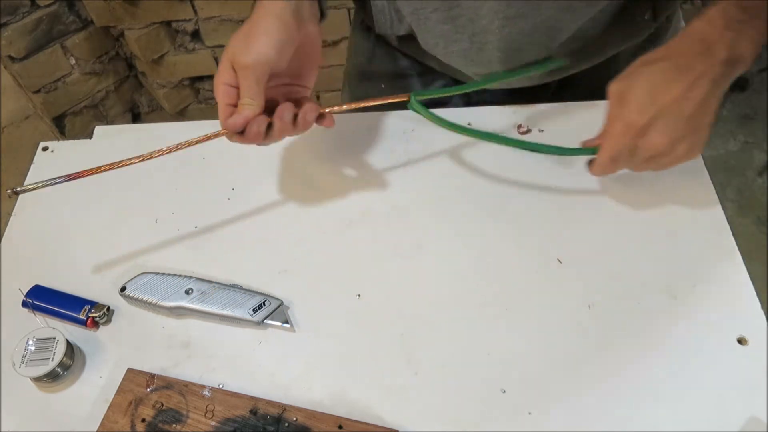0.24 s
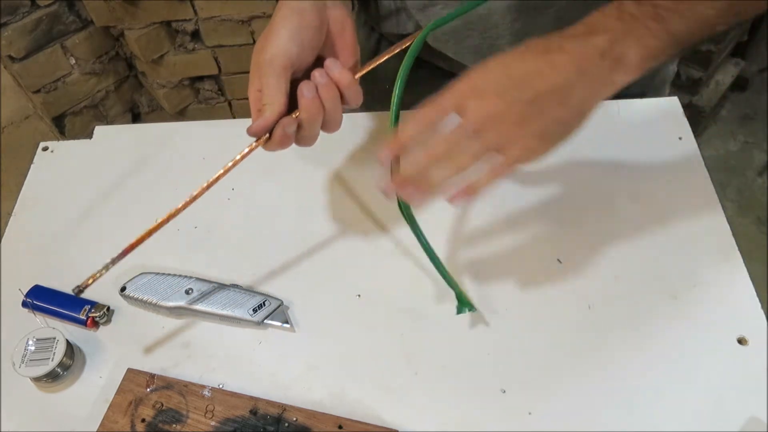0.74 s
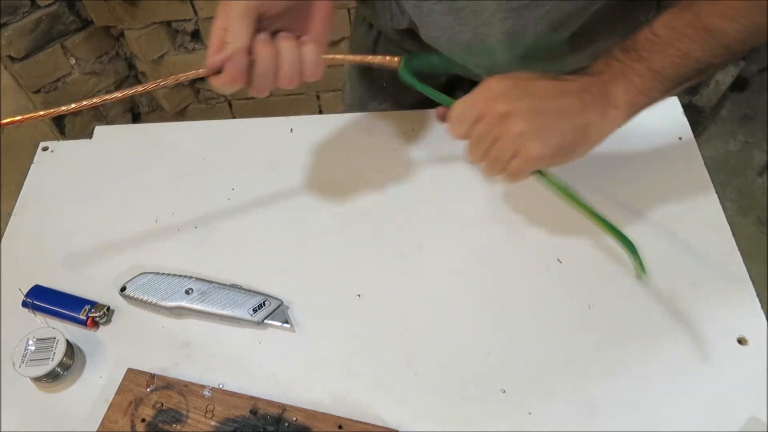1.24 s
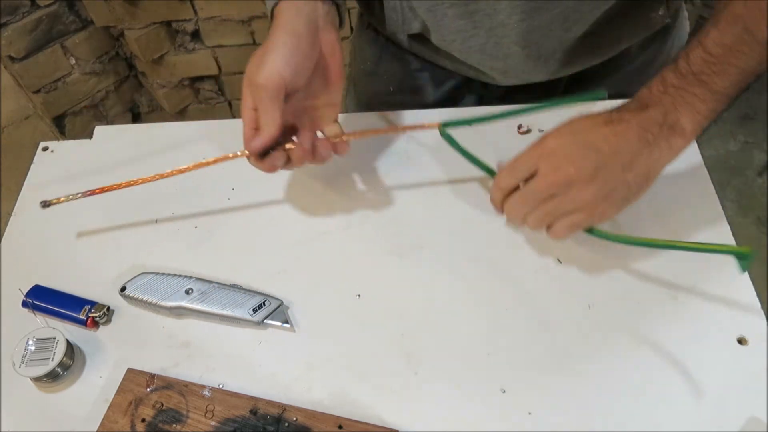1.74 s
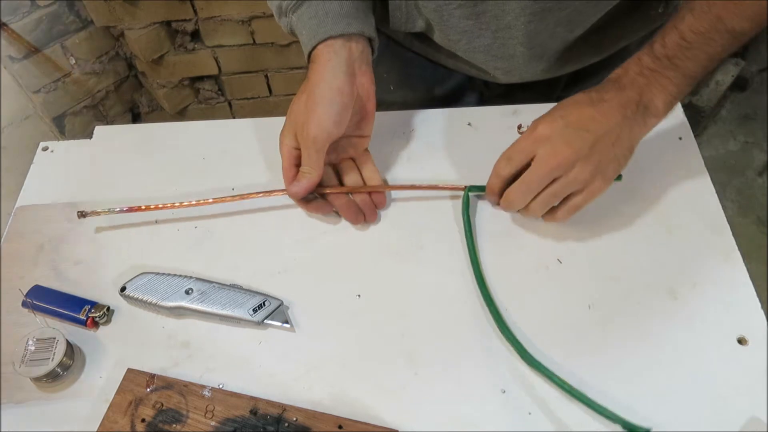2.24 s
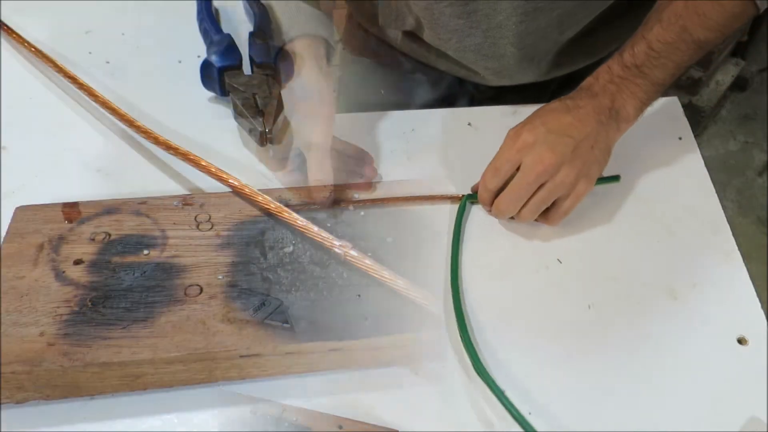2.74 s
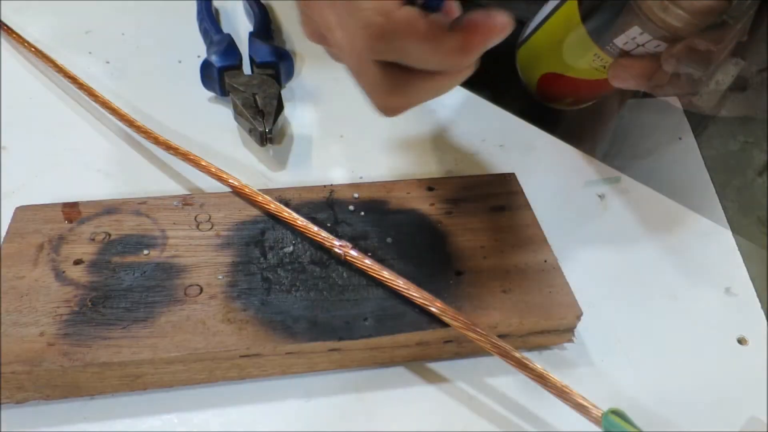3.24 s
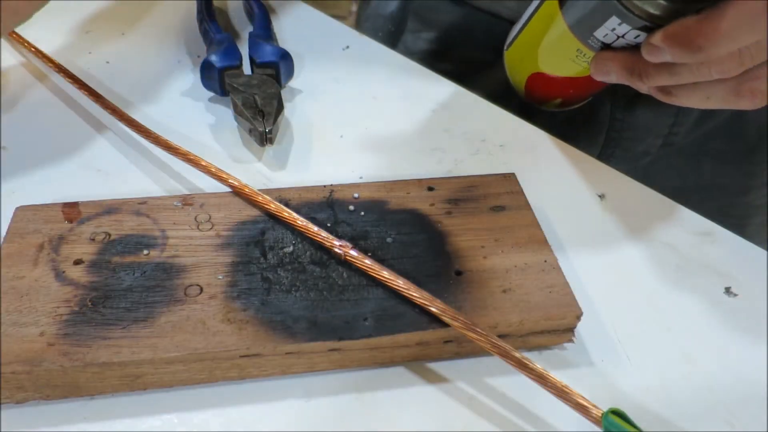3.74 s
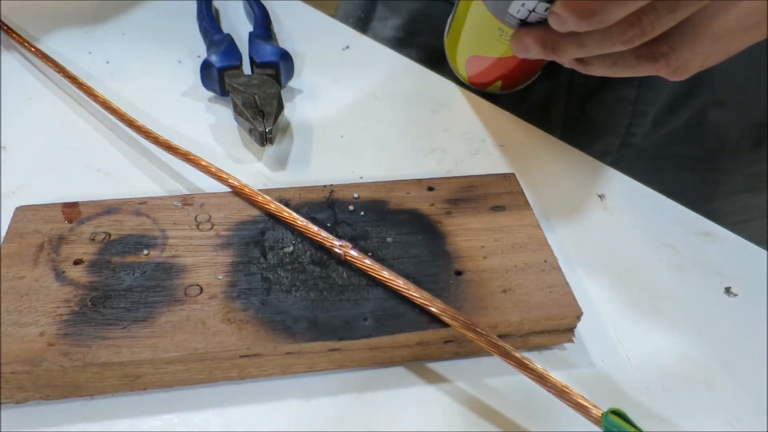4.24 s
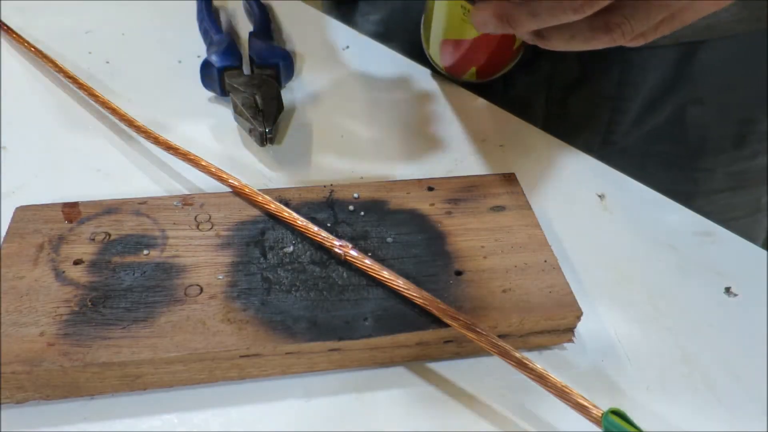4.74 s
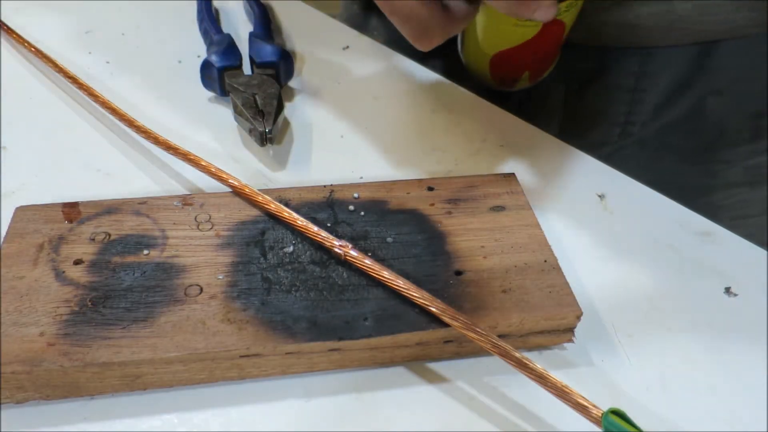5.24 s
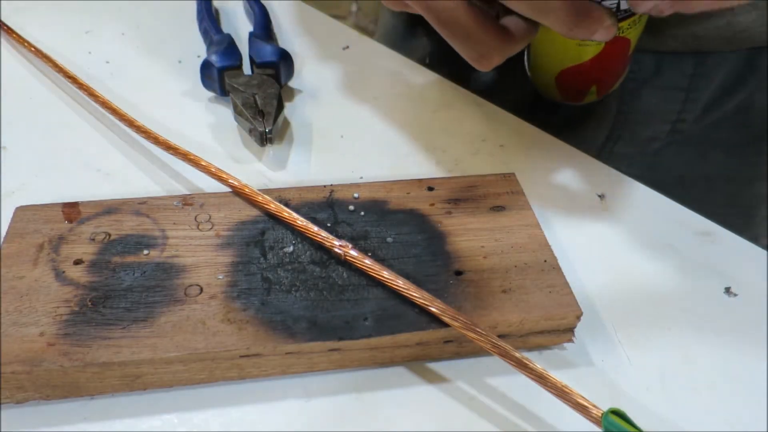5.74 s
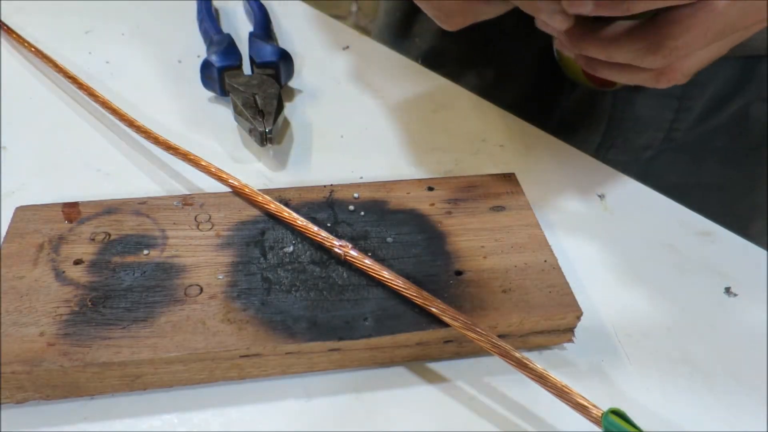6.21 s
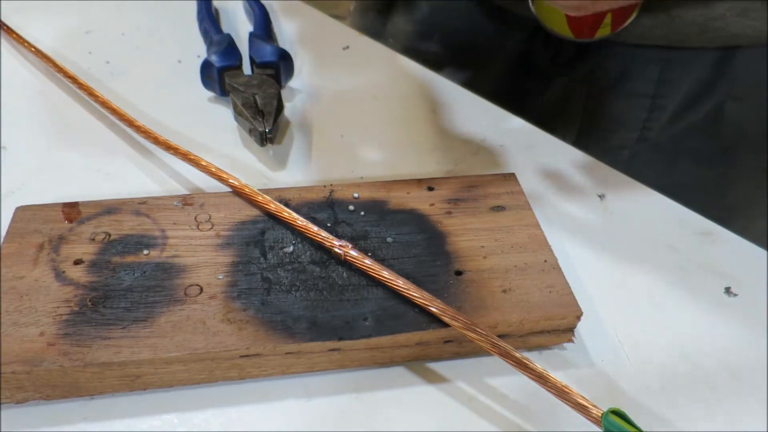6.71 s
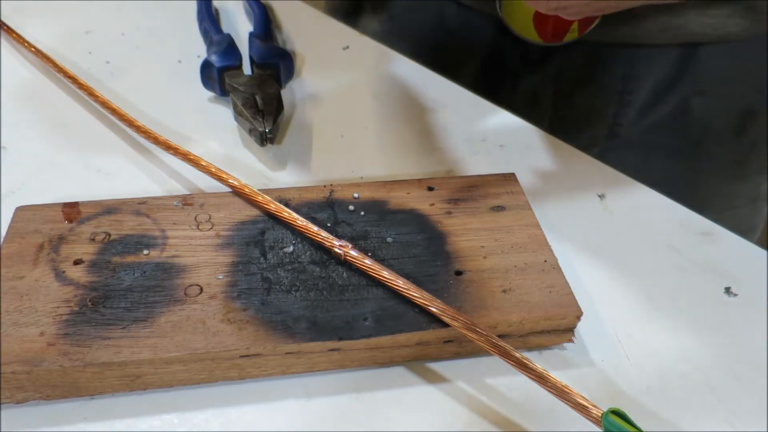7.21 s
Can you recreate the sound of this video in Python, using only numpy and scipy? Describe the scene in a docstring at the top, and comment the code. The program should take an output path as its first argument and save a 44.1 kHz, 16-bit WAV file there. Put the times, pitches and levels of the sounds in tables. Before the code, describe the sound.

Sharp crackling and a snap of stripped cable, a brief gas hiss, a lighter's scratch, then a rushing torch flame with one hard trigger clack.

```python
"""Faint workshop air; plastic insulation cracks off a thick copper cable, with one last snap.
A hand torch is opened, hisses, knocks, is lit by a flint lighter and burns; its trigger clacks twice.
Cracks, clicks, knock and pops are jolts into resonances; air, gas and flame are shaped noise.
Gain control ducks at each loud crack or clack: air and flame vanish and slowly swell back."""
import sys
import numpy as np
from scipy import signal
from scipy.fft import rfft, irfft
from scipy.io import wavfile
from scipy.ndimage import uniform_filter1d, minimum_filter1d

SR = 44100
rng = np.random.default_rng(int(sys.argv[2]) if len(sys.argv) > 2 else 0)


def store_pcm(level_fs):
    """Save levels as 16-bit WAV."""
    pcm = np.round(np.clip(level_fs, -1, 1) * 32767).astype(np.int16)
    wavfile.write(sys.argv[1], SR, np.atleast_2d(pcm).T)


N = 329427
TIME = np.arange(N) / SR  # s
HZ = np.maximum(np.arange(N // 2 + 1) * SR / N, 1)


def from_db(db):
    """Decibels to gain."""
    return 10 ** (np.asarray(db) / 20)


def rms_one(x):
    """Scale to rms 1."""
    return x / np.sqrt(np.mean(x ** 2) + 1e-20)


def in_time(rows):
    """Each column of a curve at every sample."""
    s, *columns = np.transpose(rows)
    return [np.interp(TIME, s, column) for column in columns]


def at_hz(points, hz):
    """Read a table along log frequency."""
    table = np.array(points)
    return np.interp(np.log(hz), np.log(table[:, 0]), table[:, 1])


def held(start, end, attack_s, release_s):
    """Gain that grows exponentially to 1 at `start`, holds until `end` and dies away."""
    before, after = np.maximum(start - TIME, 0), np.maximum(TIME - end, 0)
    return np.exp(-before / attack_s - after / release_s)


def strokes(rows, attack_s, release_s):
    """One held gain for each row, at its own level."""
    return sum(from_db(db) * held(start, end, attack_s, release_s) for start, end, db in rows)


def drift(rate_hz):
    """Smooth chance of rms 1 that changes about `rate_hz` times a second."""
    return rms_one(irfft(rfft(rng.standard_normal(N)) / (1 + (HZ / rate_hz) ** 2), N))


def noise_spectrum(colour, width, peaks=()):
    """Spectrum of stereo noise with a colour, a side-to-mid width and resonances."""
    gain_db = at_hz(colour, HZ)
    for hz, width_hz, db in peaks:
        gain_db = gain_db + db / (1 + (2 * (HZ - hz) / width_hz) ** 2)
    mid, side = rfft(rng.standard_normal((2, N)))
    return from_db(gain_db) * (mid + from_db(at_hz(width, HZ)) * side * [[1], [-1]])


def to_sound(spectrum):
    """Stereo spectrum to samples, with rms 1 in the middle."""
    x = irfft(spectrum, N)
    return x / x.mean(axis=0).std()


def rushing(gain, colour, width, rough_db, rate_hz):
    """Turbulent noise that follows an envelope and flutters."""
    return gain * from_db(rough_db * drift(rate_hz)) * to_sound(noise_spectrum(colour, width))


def resonate(x, hz, width_hz):
    """One two-pole resonance with gain 1 on top."""
    r = np.exp(-np.pi * width_hz / SR)
    feedback = [1, -2 * r * np.cos(2 * np.pi * hz / SR), r * r]
    return signal.lfilter(np.array([1, 0, -1]) * (1 - r * r) / 2, feedback, x)


def crackle(per_s, spread_db):
    """Random single-sample bursts of either sign and random size; rms 1."""
    sizes = from_db(spread_db * np.minimum(rng.exponential(1, N), 4)) * rng.choice([-1, 1], N)
    return rms_one(sizes * (rng.random(N) < per_s / SR))


def scatter(x, length_s, count=2):
    """Waves to and fro in a part (all-pass loops) smear a jolt in time, not in colour."""
    for share in rng.uniform(.1, .36, count):
        loop = np.r_[1, np.zeros(int(share * length_s * SR)), rng.choice([-1, 1]) * np.sqrt(.5)]
        x = signal.lfilter(loop[::-1], loop, x)
    return x


def strikes(events, modes, grit, squash, spread, pan_db, polarity=-1, detune=0, size=4096):
    """Scattered jolts and crumbling micro-slips drive modes, detuned per event; sides differ a little."""
    out, t = np.zeros((2, N + size)), np.arange(size) / SR
    for s, peak_db, loudest_hz, fall_db, length_s in events:
        jolt = (t == 0) + grit * rng.standard_normal(size) * np.exp(-t / length_s)
        force = scatter(jolt, length_s) + spread * scatter(jolt, length_s) * [[1], [-1]]
        shift = np.exp(detune * (2 * rng.random(len(modes)) - 1))
        ring = 0
        for k, (hz, width_hz, db) in enumerate(modes):
            mode_db = db - fall_db * abs(np.log2(hz / loudest_hz))
            sign = np.sign(polarity) ** k  # -1: signs alternate
            ring = ring + sign * from_db(mode_db) * resonate(force, hz * shift[k], width_hz)
        squashed = np.tanh(squash * ring / np.abs(ring).max()) / np.tanh(squash)
        start = int(s * SR)
        out[:, start:start + size] += from_db(peak_db) * squashed
    return out[:, :N] * from_db([[pan_db], [-pan_db]])


def broadened(modes, factor):
    """The same modes with scaled widths."""
    return [(hz, factor * width_hz, db) for hz, width_hz, db in modes]


def rebound(x, lag_s, echo_db):
    """The sound and one distinct reflection of it."""
    return x + from_db(echo_db) * np.array([np.interp(TIME - lag_s, TIME, side) for side in x])


# workshop reverberation: f/Hz, t60/s
ROOM_T60 = [(200, 0.79), (1000, 0.3), (4000, 0.31), (8000, 0.24), (15000, 0.21)]


def workshop(x, wet_db, early_db, early_s, size=26000):
    """Quick scatter off bench and hands, then a diffuse tail whose decay time depends on frequency."""
    t, edges_hz, tail = np.arange(size) / SR, np.geomspace(100, 17000, 9), 0
    for low, high in zip(edges_hz, edges_hz[1:]):
        common, left, right = rng.standard_normal((3, size))
        white = common + 1.16 * np.array([left, right])
        band = signal.sosfilt(signal.butter(2, [low, high], "band", fs=SR, output="sos"), white)
        tail = tail + band * from_db(-60 * t / at_hz(ROOM_T60, np.sqrt(low * high)))
    early = white[:, ::-1] * np.exp(-t / early_s) * (t > .002)
    late = from_db(wet_db) * rms_one(tail * (t > .005))
    response = (late + from_db(early_db) * rms_one(early)) / np.sqrt(size)
    return x + signal.fftconvolve(x.mean(axis=0)[None], response, axes=1)[:, :N]


# workshop air spectrum: f/Hz, relative density/dB
AIR_COLOUR = [(15, -44.5), (25, -18.5), (92, -3), (180, -8), (277, -5.5), (354, -7.5), (405, -7),
              (516, -10.5), (1020, -10.5), (2050, -12.5), (3720, -15), (10100, -23), (11600, -23),
              (16000, -31.5)]
# stereo width of diffuse noise: f/Hz, side minus mid/dB
AIR_WIDTH = [(40, -25), (200, 5), (800, 0.5), (2500, -9), (6000, -4), (15000, -2)]


def workshop_air(level_db=-41):
    """Steady broad noise, fluttering slightly."""
    return rushing(from_db(level_db), AIR_COLOUR, AIR_WIDTH, rough_db=.5, rate_hz=17)


# insulation cracks: t/s, peak level/dB, loudest f/Hz, fall-off either side/(dB/octave), length/s
CRACKS = [(.118, 2, 5500, 4, .0004), (.1342, -5, 8000, 2, .0003), (.1533, -.5, 7500, 3, .0008),
          (.1616, -7, 4200, 9, .0008), (.1727, 2, 7000, 5, .0006), (.1968, 27.5, 8600, 4, .00046),
          (.2141, 21.5, 8600, 13, .0004), (.2307, 23, 6900, 9, .0004), (.251, 23, 7500, 7, .0006),
          (.2714, 18, 8000, 9, .0006), (.2859, 17.5, 7500, 10, .0003), (.3106, 17.5, 8600, 15, .0004),
          (.816, -23, 12000, 10, .004), (1.051, -29, 12000, 5, .004), (1.068, -28.5, 11000, 7, 0.0048)]
# cable resonances: f/Hz, width/Hz, level/dB
CABLE_MODES = [(830, 260, -3.5), (1980, 360, 0.5), (2700, 300, -3), (3660, 330, -4.5), (4530, 490, 4.5),
               (5360, 700, 5), (7700, 1300, -1.5), (8700, 770, 1), (11360, 1100, 1)]
# rasp spectrum: f/Hz, relative density/dB
RASP_COLOUR = [(100, -23), (400, -4), (1000, -13), (2000, 0), (5000, 4.5), (9000, -1), (13000, -1.5),
               (16000, -18)]


def insulation(pull_from_s=.117, pull_to_s=.2, rasp_db=-33, rasp_fade_s=.038, grain_db=-7):
    """Sheath lets go of the strands in jerks; while it is pulled each sets off a rasp and tiny grains."""
    cracks = strikes(CRACKS, CABLE_MODES, grit=.035, squash=1.13, spread=.28, pan_db=-.5, detune=.12)
    cracks = rebound(cracks, lag_s=.003, echo_db=-18.5)
    jerks = 0
    for s, db, *_ in CRACKS:  # rasp_db is relative to the crack's peak
        jerks = jerks + from_db(db + rasp_db) * np.exp(-abs(TIME - s) / rasp_fade_s) * (TIME > s)
    tearing = jerks * held(pull_from_s, pull_to_s, attack_s=.002, release_s=.099)
    rasp = rushing(tearing, RASP_COLOUR, AIR_WIDTH, rough_db=2.5, rate_hz=270)
    grains = sum(from_db(db) * resonate(crackle(per_s=210, spread_db=-.5), hz, width_hz)
                 for hz, width_hz, db in CABLE_MODES)
    grains = tearing * from_db(grain_db) * rms_one(grains)
    return workshop(cracks + rasp + grains, wet_db=-15, early_db=-10, early_s=.0035)


# sheath breaks off: t/s, peak level/dB, loudest f/Hz, fall-off either side/(dB/octave), length/s
SNAP = [(1.3013, 23.5, 4070, 3.5, .0008)]
# freed sheath resonances: f/Hz, width/Hz, level/dB
SHEATH_MODES = [(1120, 370, -5), (2140, 220, 1), (3460, 400, 0.5), (4510, 250, 5), (5520, 810, 4),
                (7360, 340, -5), (8600, 650, -5.5), (10700, 1800, 3)]


def sheath_snap():
    """The sheath breaks off and rings; a broadened copy feeds only the room, which hears all sides."""
    snap = strikes(SNAP, SHEATH_MODES, grit=.022, squash=2.43, spread=.22, pan_db=-.4)
    blurred = strikes(SNAP, broadened(SHEATH_MODES, 2.7), grit=.027, squash=.74, spread=.2, pan_db=-4)
    return snap + workshop(blurred, wet_db=-15, early_db=-10, early_s=.0035) - blurred


# valve and trigger: t/s, peak level/dB, loudest f/Hz, fall-off either side/(dB/octave), length/s
CLICKS = [(2.1394, 1, 8100, 17, 0.00069), (3.811, -17, 9000, 0, 0.00093), (3.908, -21, 12000, 7, 0.0012),
          (3.9514, 10, 4300, 37, 0.00076), (3.9526, 3, 5200, 8, 0.00094), (3.9788, -10, 5500, 9, .0004),
          (3.9845, 22.5, 2700, 14, 0.00049), (3.9852, 22, 3500, 14, 0.00077),
          (4.0445, -3.5, 3000, 7, 0.00091), (4.0822, -0.5, 1550, 40, 0.00044), (4.083, -8, 7500, 18, .001),
          (4.115, -11.5, 8000, 24, 0.0023), (4.135, -11, 1690, 14, .001), (4.149, -20, 8080, 11.5, .002),
          (6.303, -19, 9000, -3, 0.0014), (6.484, -23, 11000, -5, 0.0013)]
# torch body resonances: f/Hz, width/Hz, level/dB
TORCH_MODES = [(950, 500, 1), (1550, 250, 6.5), (2050, 460, 8.5), (2700, 460, 7.5), (3600, 540, 6),
               (4690, 300, 0), (5750, 1100, -3.5), (7260, 2500, 0), (8800, 1400, -17), (11300, 3700, -3)]


def torch_clicks():
    """Valve and trigger jolt the torch body, which rings."""
    clicks = strikes(CLICKS, TORCH_MODES, grit=.028, squash=1.29, spread=.51, pan_db=.5,
                     polarity=1, detune=.053)
    return workshop(clicks, wet_db=-19.5, early_db=-11, early_s=.0066)


# trigger slides, light then hard: from t/s, to t/s, level/dB
SLIDES = [(3.935, 3.951, -31.5), (3.955, 3.982, -22), (3.988, 4.001, -9)]
# slide spectrum: f/Hz, relative density/dB
SLIDE_COLOUR = [(200, -12), (1000, -2), (2500, 1), (6000, -5.5), (10000, -8), (15500, -8)]


def trigger_slide():
    """The trigger slides under the finger: short strokes of rough noise."""
    stroke = strokes(SLIDES, attack_s=.001, release_s=.0039)
    return rushing(stroke, SLIDE_COLOUR, AIR_WIDTH, rough_db=3.5, rate_hz=180)


# hollow torch knock: t/s, peak level/dB, loudest f/Hz, fall-off either side/(dB/octave), length/s
KNOCK = [(2.41, 5, 1280, 2, 0.00057)]
# knock resonances: f/Hz, width/Hz, level/dB
KNOCK_MODES = [(227, 23, -1.5), (385, 51, -5.5), (1034, 347, 3.5), (1304, 448, 6), (1485, 420, -1),
               (2340, 360, -22), (4140, 900, -28), (9000, 5900, -47)]


def torch_knock():
    """Hollow knock with one wall echo; a narrowed copy feeds only the room, which hears all sides."""
    knock = strikes(KNOCK, KNOCK_MODES, grit=.02, squash=1.22, spread=.077, pan_db=.1)
    blurred = strikes(KNOCK, broadened(KNOCK_MODES, .9), grit=.027, squash=.92, spread=.1,
                      pan_db=-3.5, polarity=1)
    tail = workshop(blurred, wet_db=-9.5, early_db=-9.5, early_s=.011) - blurred
    return rebound(knock, lag_s=.0135, echo_db=-15) + tail


# burner tick: t/s, peak level/dB, loudest f/Hz, fall-off either side/(dB/octave), length/s
TICK = [(2.8422, -6, 3100, 2, .002)]
# burner resonances: f/Hz, width/Hz, level/dB
TICK_MODES = [(2780, 230, -1), (3100, 260, 0), (3500, 260, -1), (7000, 500, -9)]


def burner_tick():
    """The burner ticks once as it heats, and rings."""
    tick = strikes(TICK, TICK_MODES, grit=.042, squash=.43, spread=.27, pan_db=0)
    return workshop(tick, wet_db=-9, early_db=-10, early_s=.008)


LIT_S = 2.597  # flame catches
# unlit gas spectrum: f/Hz, relative density/dB
GAS_COLOUR = [(47, -30), (80, 3), (242, -6), (323, -16), (404, -5), (937, -6), (1400, -4.5), (1740, -7.5),
              (2900, -4.5), (4700, -7), (5450, 1.5), (6100, -5), (7300, -5.5), (8300, -11.5), (9900, -4),
              (11000, -10), (16000, -21)]
# stereo width of the jet: f/Hz, side minus mid/dB
JET_WIDTH = [(60, -42), (300, -40), (1400, -19), (3100, -49), (6000, -25), (10000, -4), (15000, -3)]


def unlit_gas(valve_s=2.142, level_db=-36.5, burst_db=14, settle_s=.066):
    """The valve opens with a burst that settles to a steady hiss until the flame catches."""
    burst = from_db(level_db + burst_db * np.exp(-abs(TIME - valve_s) / settle_s))
    gain = burst * held(valve_s, LIT_S, attack_s=.0041, release_s=.017)
    return rushing(gain, GAS_COLOUR, JET_WIDTH, rough_db=.9, rate_hz=30)


# flint wheel spun: from t/s, to t/s, level/dB
FLINT_STROKES = [(2.568, 2.579, -13)]
# flint spectrum: f/Hz, relative density/dB
FLINT_COLOUR = [(500, -18), (2000, -10), (3500, -5.5), (5300, -2), (7000, -7), (10500, -9.5), (12000, 1),
                (13400, -0.5), (14700, -3), (16000, -25)]
# lighter wheel resonances: f/Hz, width/Hz, level/dB
WHEEL_MODES = [(5340, 150, -2), (11890, 90, -4), (12755, 80, -2), (13200, 110, -10), (13700, 80, -4),
               (13800, 50, 1)]


def flint(grain_db=-1, ring_db=-4):
    """The lighter's wheel grinds over its flint: a rasp full of sharp sparks that ring the wheel."""
    sparks = rms_one(resonate(crackle(per_s=1300, spread_db=2.5), hz=9000, width_hz=14000))
    colour_gain = from_db(at_hz(FLINT_COLOUR, HZ))
    grinding = from_db(grain_db) * to_sound(rfft(sparks) * colour_gain[None])
    ring = sum(from_db(db) * resonate(sparks, hz, width_hz) for hz, width_hz, db in WHEEL_MODES)
    ring = from_db(ring_db) * rms_one(ring)
    stroke = strokes(FLINT_STROKES, attack_s=.0073, release_s=.012)
    width = [(500, -27), (6000, -28), (14000, -2)]  # f/Hz, side minus mid/dB
    rasp = rushing(stroke, FLINT_COLOUR, width, rough_db=.5, rate_hz=480)
    return stroke * (grinding + ring) + rasp


# gas pops as the valve opens and the flame catches and sputters:
# t/s, peak level/dB, loudest f/Hz, fall-off either side/(dB/octave), length/s
PUFFS = [(2.14, -12.5, 830, 11, 0.0027), (2.593, -4.5, 130, 0, 0.0061), (2.602, -5, 510, 2.5, 0.0018),
         (2.609, -4.5, 1000, 2, 0.0044), (2.876, -7, 200, 17, 0.0033), (2.921, -6.5, 217, 11, 0.0024),
         (2.932, -16, 1110, 21, 0.0046), (3.353, -16, 280, 17, .005), (3.882, -15, 250, 3, 0.0031),
         (4.173, -18, 220, 8, 0.004), (6.448, -15, 300, 11, 0.0044)]
# pop resonances: f/Hz, width/Hz, level/dB
PUFF_MODES = [(110, 73, 3.5), (250, 155, 0.5), (580, 290, -10.5), (1130, 1200, -14)]


def gas_puffs():
    """Pops of gas thump in broad low modes."""
    puffs = strikes(PUFFS, PUFF_MODES, grit=.07, squash=1.33, spread=.082, pan_db=-.5)
    return workshop(puffs, wet_db=-14.5, early_db=-11, early_s=.012)


# burner tube sings out: from t/s, to t/s, level/dB
HOWLS = [(2.85, 3.898, -35.5), (6.593, 7.47, -34)]


def howl():
    """The burner tube sings hoarsely at its resonance."""
    tone = rms_one(resonate(rng.standard_normal(N), hz=940, width_hz=62))
    return strokes(HOWLS, attack_s=.069, release_s=.044) * tone


# breathy jet tones: f/Hz, width/Hz, level against hiss/dB
JET_TONES = [(6740, 290, -20), (9730, 510, -14.5)]
# jet tones stand out: from t/s, to t/s, lift/dB
WHISTLES = [(6.375, 6.43, 10), (6.69, 6.803, 12.5)]


def jet_tones(waver=.0086, swell_db=2):
    """Narrow bands that waver in pitch with the gas flow, come and go, and stand out at times."""
    flow_s = np.cumsum(1 + waver * drift(4)) / SR
    tones = 0
    for hz, width_hz, db in JET_TONES:
        band = rms_one(drift(width_hz) * np.cos(2 * np.pi * hz * flow_s))
        tones = tones + from_db(db + swell_db * drift(2)) * band
    lift_db = sum(db * held(start, end, attack_s=.022, release_s=.02) for start, end, db in WHISTLES)
    return tones * from_db(lift_db)


def sizzle(hiss_db, relative_db=-14):
    """Fine crackle of the flame, riding on its hiss."""
    grains = resonate(crackle(per_s=250, spread_db=5.5), hz=9000, width_hz=9000)
    return from_db(hiss_db + relative_db) * rms_one(grains)


def echo(x, path, tremble=.005, thin_s=.000099):
    """A thin echo combs the sound; its notches glide and waver with the hand."""
    lag_s, echo_db = in_time(path)
    lag_s, gain = lag_s * (1 + tremble * drift(5.5)), from_db(echo_db)
    # subtracting a slightly later copy thins the bass
    back = np.array([np.interp(TIME - lag_s, TIME, side) - np.interp(TIME - lag_s - thin_s, TIME, side)
                     for side in x])
    return (x + gain * back) / np.sqrt(1 + 2 * gain ** 2)


# gas flow, overshoots as the valve opens, then settles: t/s, level against normal/dB
FLOW = [(2.6, 3), (2.82, 6.5), (2.85, 6.5), (3.2, 4), (3.9, 1.5), (4.4, -3), (4.76, 0.3), (5.35, -2),
        (6.2, -0.66), (7.0, 0.7), (7.47, -0.5)]
# sputter while the burner is cold: t/s, depth/dB
SPUTTER = [(2.6, 1.5), (3.0, 1.2), (3.9, 1.0), (4.3, .6)]
# torch moved, flame brighter or duller: from t/s, to t/s, rush/dB, hiss/dB, top of hiss/dB
SURGES = [(2.71, 3.924, 1.3, 0.6, 1), (2.835, 2.946, 2, -1, 3.5), (4.523, 4.65, -2, -3.5, -8),
          (4.735, 4.807, -3, -1.5, 3), (5.212, 5.246, 0, 0, 8.5), (5.454, 5.69, 2.5, 2, -2),
          (5.703, 5.885, 7.5, 7, 10.5), (6.3, 6.49, -2, 0, 2), (6.575, 6.677, 3, 4.5, 8.5),
          (6.69, 6.795, -0.5, -0.5, -2), (6.845, 6.93, 1.5, -2, -22), (6.984, 7.4, 1.5, 2.5, 2.5)]
# flame spectrum: f/Hz, relative density/dB
FLAME_COLOUR = [(18, -59), (30, -34), (103, -13), (141, -5.5), (280, 1.5), (437, -4), (499, -6), (822, -12),
                (937, -9.5), (1630, -18), (2680, -21.5), (3310, -27), (6720, -34.5), (13000, -52),
                (16000, -63)]
# burner and bench resonances, as peaks and dips: f/Hz, width/Hz, level/dB
FLAME_PEAKS = [(152.6, 28, 4), (211.6, 15, 5), (251.4, 27, -6.5), (279.7, 18, 3.5), (439, 54, -4.5),
               (500, 22, 7.5), (528, 22, -1.5), (643.5, 21, 8), (800, 780, 0.5), (940, 89, 3.5),
               (2840, 72, 2.5), (3770, 260, 1.5), (8350, 1000, -1.5), (9900, 600, 3)]
# bench echo as the torch moves: t/s, mean lag/s, gain before thinning/dB
BENCH_ECHO = [(2.6, .00076, -19), (3.4, .00077, -21), (4.1, .00082, -19), (4.65, .00069, -21),
              (4.98, .00068, -13), (5.25, .00053, -17), (5.5, .00064, -16), (5.95, .0005, -16),
              (6.33, .00046, -15), (6.45, .00061, -14), (6.6, .00085, -12), (6.97, .0009, -11.5),
              (7.15, .00084, -17), (7.47, .00075, -14)]
# later echo off the person at the bench: t/s, mean lag/s, gain before thinning/dB
BODY_ECHO = [(2.9, 0.00097, -20), (3.9, .00104, -18), (4.2, .00119, -20), (4.85, .00111, -25),
             (5.08, 0.00091, -13), (5.45, .00111, -24), (5.9, 0.00095, -25), (7.4, .00121, -28)]


def flame(roar_db=-25.5, rush_db=-36, hiss_db=-44.5, pan_db=-.7):
    """Combustion roars, the hot burner rushes, the jet hisses; the same flow and eddies drive all."""
    flow_db, = in_time(FLOW)
    sputter_db, = in_time(SPUTTER)
    flow_db = flow_db + sputter_db * drift(32)
    rush_surge_db, hiss_surge_db, top_surge_db = sum(
        np.outer(lifts_db, held(start, end, attack_s=.0095, release_s=.021))
        for start, end, *lifts_db in SURGES)
    top_db = hiss_db + flow_db + top_surge_db
    spectrum, eddies = noise_spectrum(FLAME_COLOUR, JET_WIDTH, FLAME_PEAKS), drift(120)
    low = 1 / (1 + (HZ / 1200) ** 6)
    high = 1 / (1 + (4500 / HZ) ** 6)
    highest = 1 / (1 + (10000 / HZ) ** 12)
    roar, rush, hiss = (to_sound(spectrum * share) for share in (low, 1 - low - high, high))
    pan = pan_db * np.array([[1], [-1]])
    roar = roar * from_db(roar_db + flow_db + .7 * eddies + pan)
    rush = rush * from_db(rush_db + flow_db + rush_surge_db + 1.5 * eddies + .5 * pan)
    top = irfft(rfft(hiss) * highest, N)
    hiss = (hiss - top + jet_tones()) * from_db(hiss_db + flow_db + hiss_surge_db)
    top = top * from_db(top_db + drift(25))
    hiss = (hiss + top) * from_db(eddies)
    reflected = echo(echo(rush + hiss + sizzle(top_db), BENCH_ECHO), BODY_ECHO)
    return (roar + howl() + reflected) * np.clip((TIME - LIT_S) / .0037, 0, 1)


def scene():
    """Workshop air, cable, torch handling, lighting and flame."""
    cable = insulation() + sheath_snap()
    handling = torch_clicks() + trigger_slide() + torch_knock() + burner_tick()
    lighting = unlit_gas() + flint() + gas_puffs()
    return workshop_air() + cable + handling + lighting + flame()


def gain_control(x, ceiling_db=-4.5, recovery_s=1.184, first_cut_db=13, size=45):
    """A peak over the ceiling cuts the gain at once; the cut in dB fades slowly, starting part way down."""
    over_db = np.maximum(20 * np.log10(np.abs(x).max(axis=0) + 1e-9) - ceiling_db, 0)
    fade = np.exp(-TIME / recovery_s)
    cut_db = np.maximum(np.maximum.accumulate(over_db / fade), first_cut_db) * fade
    return x * from_db(uniform_filter1d(minimum_filter1d(-cut_db, size), size))


def record(dry):
    """Gain control, then a steep low-pass at 16 kHz."""
    low_pass = signal.ellip(10, .1, 80, 16000, fs=SR, output="sos")
    return signal.sosfilt(low_pass, gain_control(dry))


dry = scene()
out = record(dry)
store_pcm(out)
```